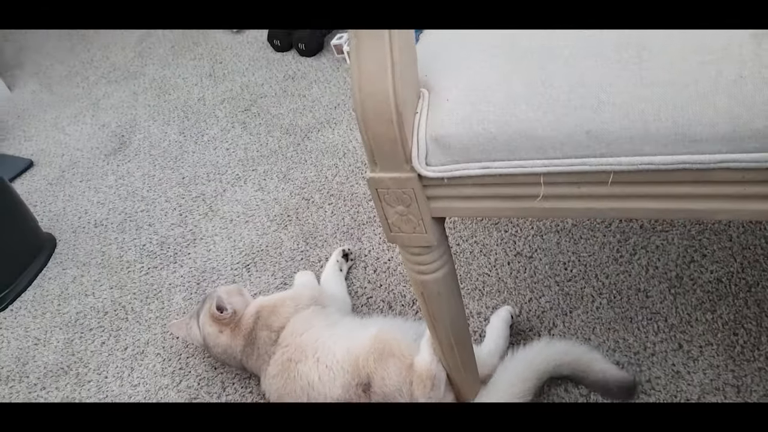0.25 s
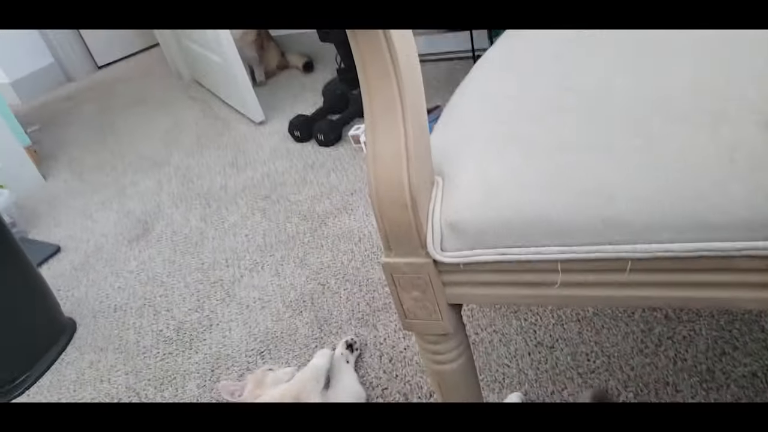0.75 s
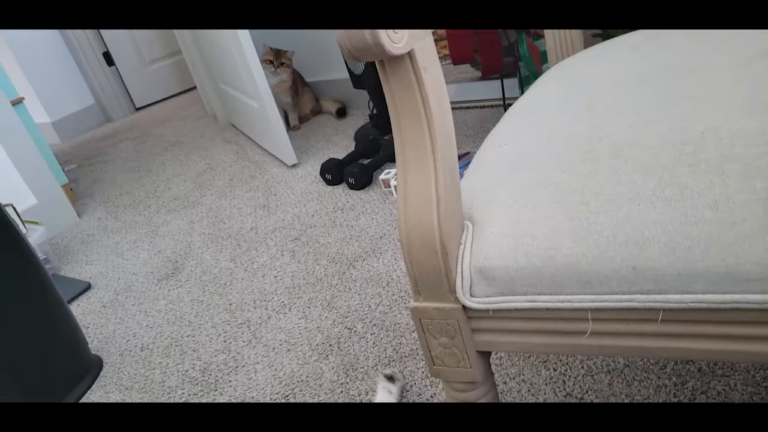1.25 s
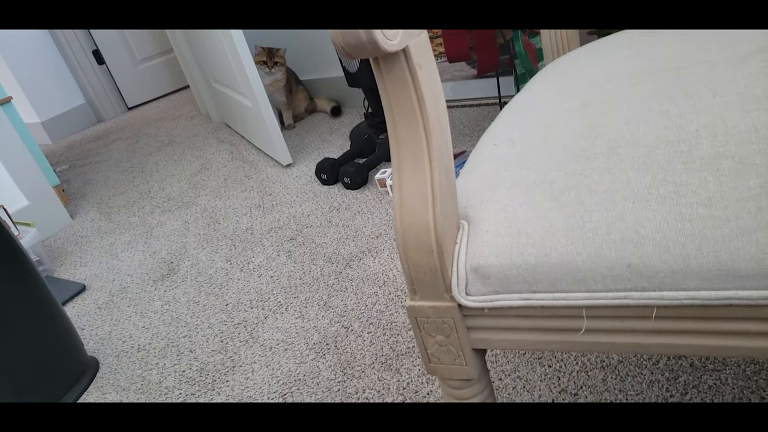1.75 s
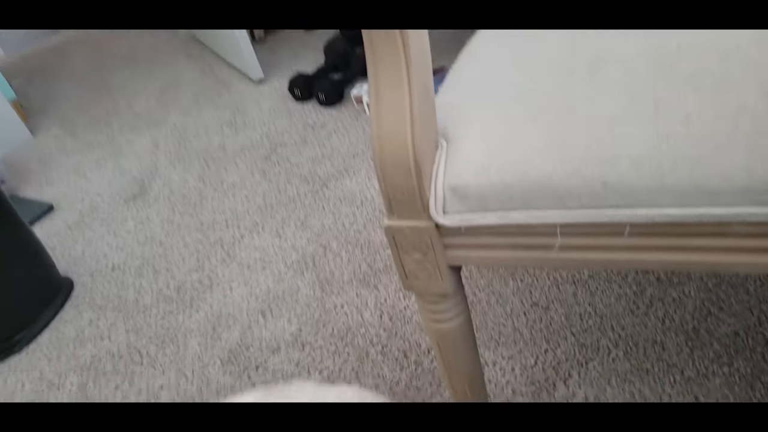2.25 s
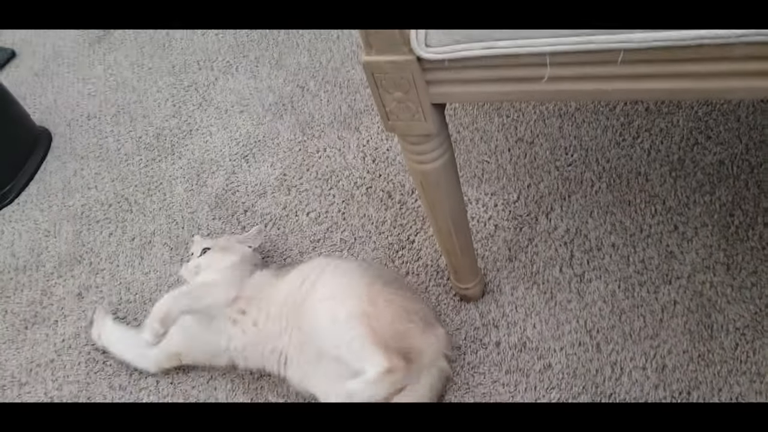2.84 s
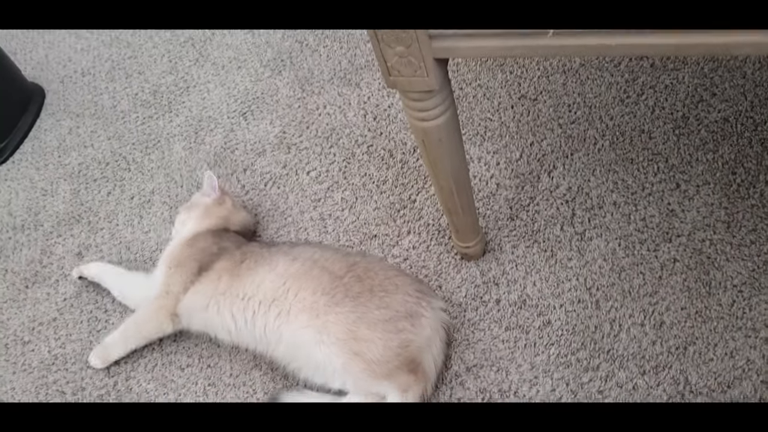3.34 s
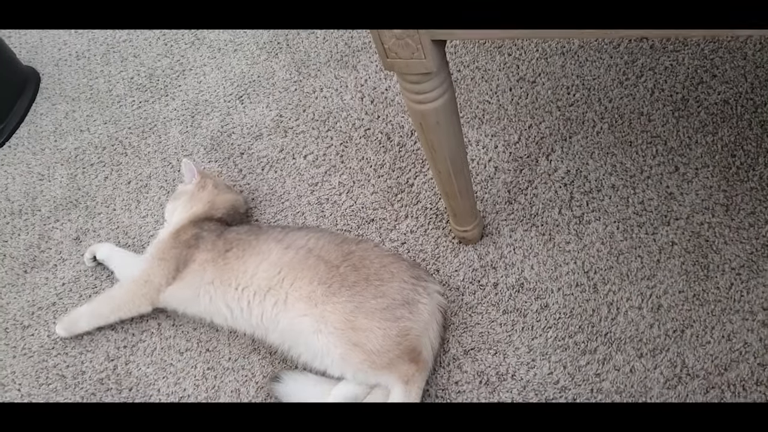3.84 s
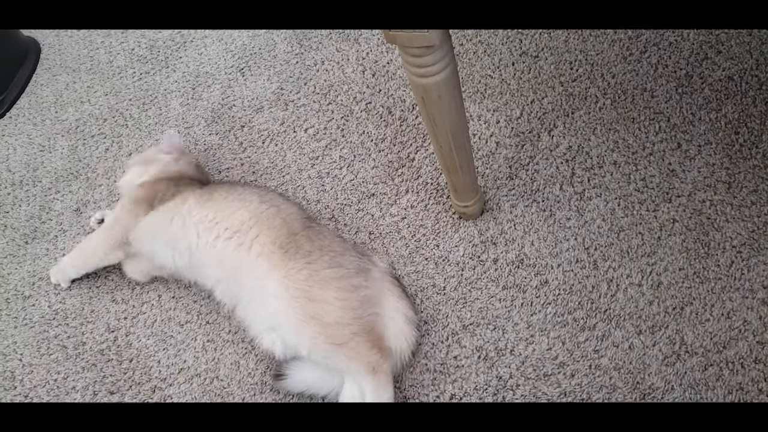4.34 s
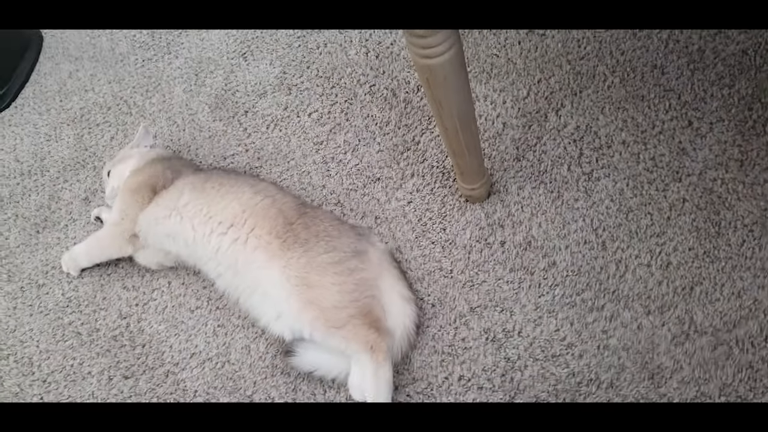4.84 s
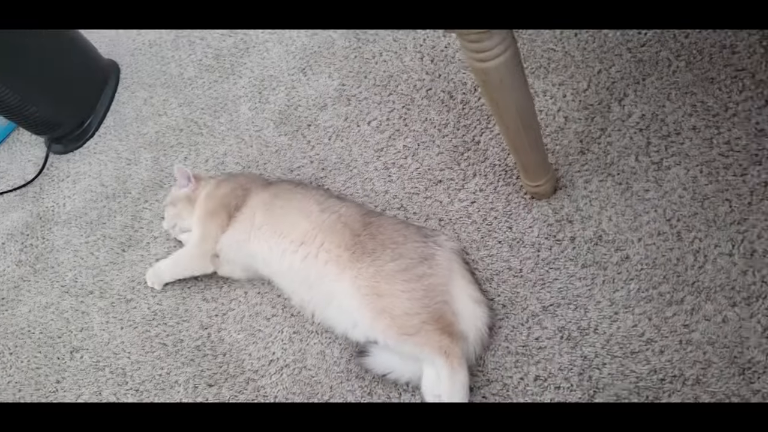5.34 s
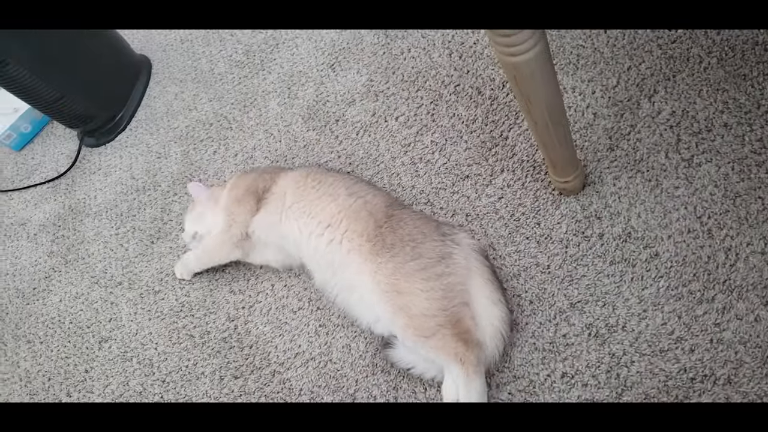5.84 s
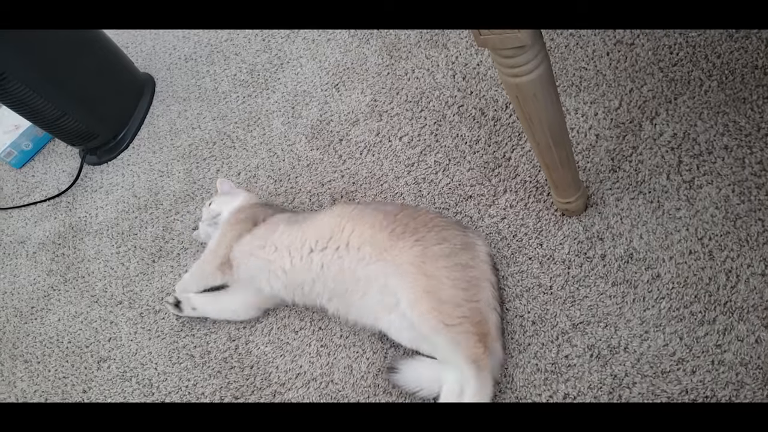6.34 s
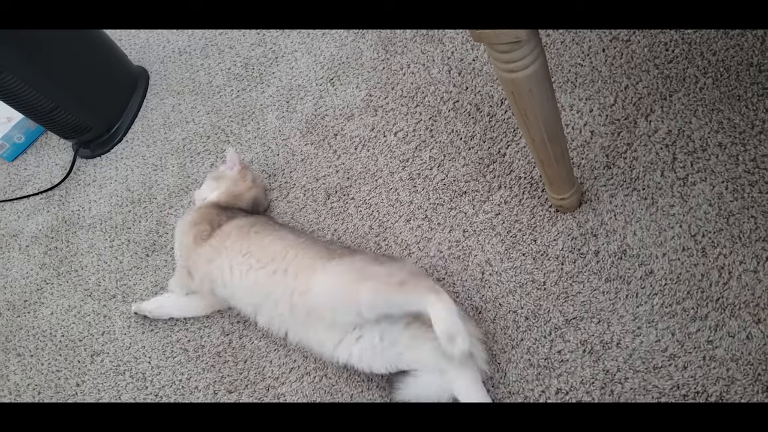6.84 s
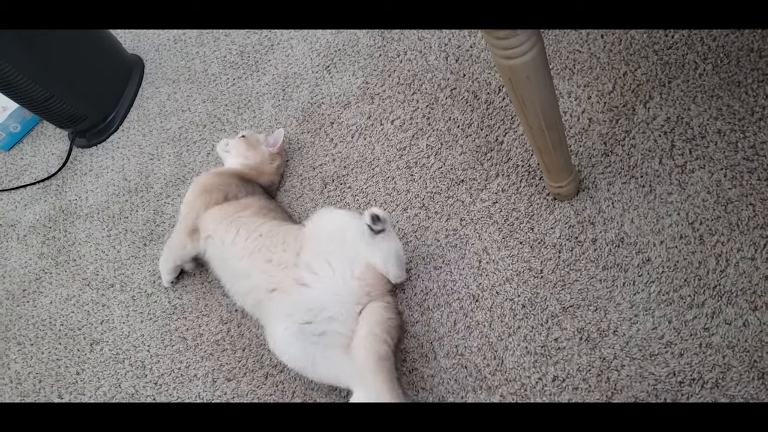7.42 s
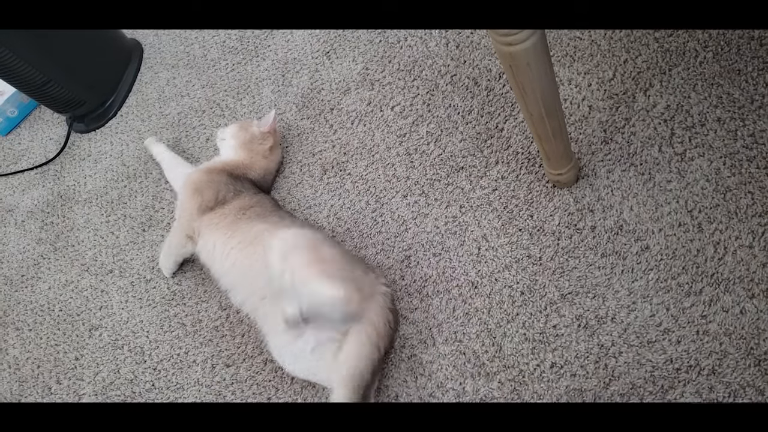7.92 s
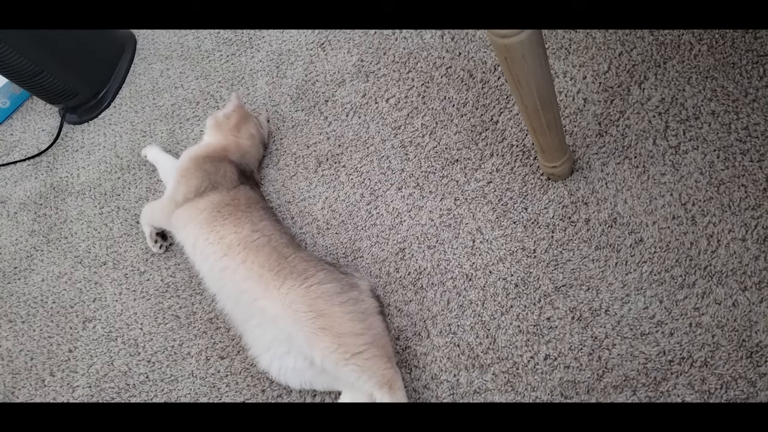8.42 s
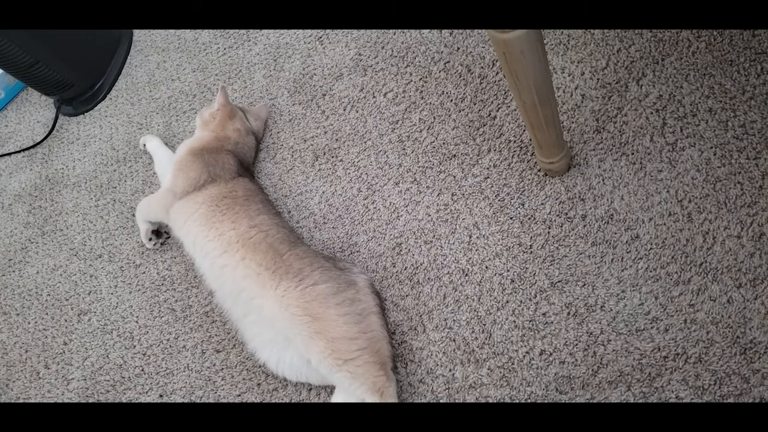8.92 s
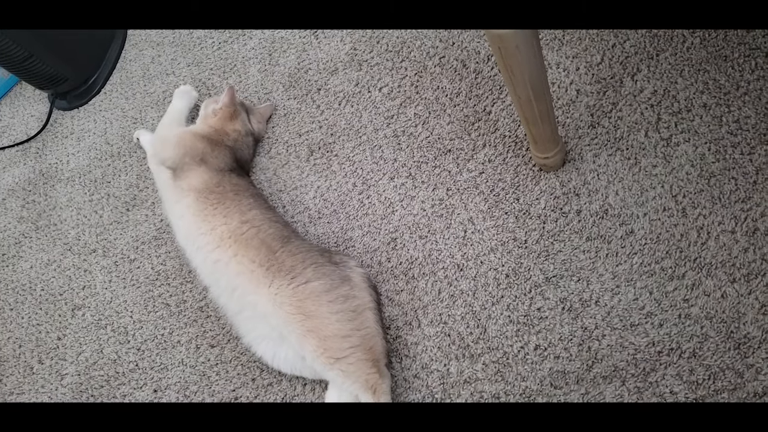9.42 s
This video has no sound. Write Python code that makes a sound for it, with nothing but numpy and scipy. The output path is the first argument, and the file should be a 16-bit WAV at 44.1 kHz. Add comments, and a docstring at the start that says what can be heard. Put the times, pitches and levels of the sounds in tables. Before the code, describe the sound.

Very close stereo handling noise dominates: sharp clacks and thuds on a phone case, little stick-slip creaks and brief skin rubs, busiest at the start and again past two seconds. A cat across the small quiet room murmurs almost pure, wavering low mews, very faint. After five seconds only scattered knocks and light scuffs remain over soft room hiss and hand rumble.

```python
"""Handled phone and a distant cat

Fingers on a hand-held phone knock, creak and rub right at its two microphones, in a quiet carpeted room.
Knocks and creaks are short rings shaped by the case; rubs are crowds of tiny slips over a smooth hiss.
Farther off a cat gives a few soft, low, wavering calls: a few harmonics, hoarser where the pitch sags.
Room reflections, a lumpy rumble from the hand, and the still room's rumble and hiss lie beneath.
"""
import sys
import numpy as np
from scipy import signal
from scipy.fft import rfft, irfft, next_fast_len
from scipy.io import wavfile
from scipy.ndimage import map_coordinates

SR = 44100
rng = np.random.default_rng(int(sys.argv[2]) if len(sys.argv) > 2 else 0)


def file_out(sig):
    """Save sig as 16-bit WAV at sys.argv[1]."""
    # one column per channel
    cols = np.atleast_2d(sig).T
    # limit, then scale
    lim = np.clip(cols, -1, 1)
    pcm = np.round(lim * 32767).astype(np.int16)
    wavfile.write(sys.argv[1], SR, pcm)


N = 426888

# single knocks on the case; top_hz is low for a fingertip, high for a nail:
# start_s, strength_db, thump_db, hardness_db, top_hz
KNOCKS = [(0.0158, 29.5, 6.5, -9.5, 16000), (0.0299, 34.5, 1, -10, 16100), (0.127, 7.5, 20, 1.5, 6070),
          (0.1902, 33, 9, -1, 20000), (0.282, 21.5, 15.5, -12, 12000), (0.2922, 29, 11.5, 8, 20100),
          (0.307, 36.5, 5, -2.5, 16000), (0.3256, 37.5, 3, 0.5, 20000), (0.6074, 28, 8.5, -10.5, 12000),
          (0.6627, 36.5, 2, -7.5, 3070), (0.703, 38, -0.5, -8.5, 3100), (0.7071, 22, 0, -0.5, 9000),
          (0.718, 26.5, 9, -3.5, 9100), (0.7535, 34.5, 7, -2, 3050), (0.7991, 17, -5, -4, 9000),
          (0.9558, 31.5, 4.5, 4, 4100), (1.0731, 34.5, 2.5, -11, 2890), (1.8786, 4, 15, -1.5, 5500),
          (2.1246, 10.5, 14, 3, 4000), (2.1514, 14, 14, 0.5, 9000), (2.1646, 30.5, 11, -27, 1000),
          (2.1855, 18.5, 20.5, -4.5, 4240), (2.2617, 20, 9, -14.5, 2800), (2.3138, 20, 10.5, -4, 2530),
          (2.3471, 19, 8, -12.5, 3460), (2.353, 20, 0, -4.5, 18000), (2.4557, 17.5, 3, -18, 4000),
          (2.5782, 22.5, 6.5, -20, 1800), (2.6285, 26, -1, -3, 16000), (2.6885, 14.5, 9.5, -8, 1300),
          (3.0776, 4, 16, 3, 1600), (3.4071, 13, -1, -2, 4500), (3.6061, 11, 3.5, -16, 3500),
          (3.8507, 1, 16, -13, 5960), (4.7194, 7.5, 4.5, 15.5, 10030), (4.85, 22, -3, -9.5, 4000),
          (4.885, 21, 16, 1.5, 5460), (5.0911, 6, 13, -6.5, 8000), (6.0984, 7, 9.5, -3, 1100),
          (6.1283, 8.5, 4, -5, 11000), (6.6901, 23, 0.5, -6, 2500), (7.456, 32, -3, -4.5, 3430),
          (7.5372, 30, -2.5, -10.5, 2900), (7.7381, 5.5, 10.5, -8, 4500), (7.9229, 8, 1.5, -9, 3003),
          (8.2, -7, 1, -4, 4006)]
# creaks, a finger sticking and slipping at a steady pace; the last four describe the first slip:
# start_s, slip_count, gap_s, swell_db_per_slip, strength_db, thump_db, hardness_db, top_hz
CREAKS = [(0.9712, 3, 0.017, 3.5, 22.5, 7, -14.5, 3500), (1.094, 3, .015, 1, 22, 4.5, -13, 3500),
          (1.484, 3, 0.013, 2.5, 12.5, 5, -14, 4100), (2.6361, 6, .0066, -0.7, 15, 12, 0.5, 1400),
          (2.7885, 4, .0123, 1, 17.5, 3, 0.5, 12900), (4.984, 3, 0.019, 1, 12.5, 14, 1, 5100)]
# corner frequencies of a blow's colour: hz
COLOUR_HZ = [80, 280, 760, 1600, 2900, 5400]
# transfer of a blow through the case to each microphone: hz, left_db, right_db
CASE_TRANSFER = [(25.61, -43, -26), (66.8, -6, 7), (100.7, -4.5, -2), (147, -5.5, -3), (240, -0.5, -8),
                 (550, -4, -14), (1135, -18.5, -24), (1966, -24, -28.5), (3086, -27.5, -30.5),
                 (4850, -29, -33), (5913, -29, -43.5), (7600, -45.5, -44), (11500, -38.5, -35),
                 (16000, -46.5, -51.5)]
# resonances of the held case, peaks or dips, before tuning by the grip: centre_hz, width_hz, left_db, right_db
CASE_MODES = [(135.1, 50, 3, -4.5), (177, 23, -5.5, 3), (252.8, 40, 4.5, -7), (366, 70, -4, 6),
              (446, 60, 3.5, -0.5), (540, 220, -5, 0.5), (820, 110, 2.5, -0.5), (1090, 200, -5.5, -4)]
# the finger's place on the case; tuning scales the resonance centres:
# time_s, right_delay_s, snap_hz, tuning_ratio, hollow_db, left_over_right_db
GRIP = [(.33, -0.00066, 3250, 0.91, 4, 6), (.6, -0.000088, 2420, 0.98, -1.5, -1.5),
        (1.13, 0.0013, 2480, 1.03, -5.5, -3.5), (1.48, -0.0007, 2510, 1, 0, 8),
        (2.2, 0.0008, 2660, 0.8, 3.5, 2), (2.64, .00018, 2800, 1.05, 8, 7),
        (2.799, .00018, 2700, 1.1, 10.5, 0), (3.6, .0001, 1980, 1.05, 16, -7.5),
        (4.72, .00038, 2650, 1.06, -2, 7), (5.1, 0.0017, 2500, 1.02, 6.5, 11.5),
        (6.1, 0.0039, 2000, 1, 4.5, 3), (6.7, 0.0011, 2007, 1.042, 6.5, 4.5)]
# skin sliding on the case: start_s, length_s, level_db, brightness_db_per_octave
RUBS = [(0.951, 0.062, -34.5, 2), (1.096, 0.052, -31, 0.5), (1.506, 0.071, -39, -2), (2.141, 0.058, -47, 4),
        (2.525, 0.025, -34, 1.5), (2.559, 0.16, -37, 0.5), (2.725, 0.044, -33.5, -2.5),
        (2.821, 0.046, -40.5, 1), (3.61, 0.11, -42, .5), (4.845, 0.13, -37.5, 1), (4.982, 0.08, -39, 1),
        (5.83, 0.066, -50, -3.5), (5.988, 0.077, -42, -0.5), (6.101, 0.07, -38.5, -5),
        (7.143, 0.016, -51.5, 3)]
# rub spectrum before brightness: hz, relative_db
RUB_SPECTRUM = [(40, -4.5), (130, 5.5), (260, 7.5), (600, -3.5), (1000, -8.5), (1600, -17.5), (2500, -26.5),
                (5500, -36), (7500, -54), (12000, -37), (16000, -50)]
# cat calls: relative_level_db, second_harmonic_db, hoarseness_0_to_1, pitch curve of (time_s, pitch_hz)
CAT_CALLS = [ (-44, -21.5, .2, [(1.16, 303.3), (1.28, 254.7), (1.34, 245)]),
             (-42, -20, 0.16, [(1.35, 245.4), (1.48, 234.4), (1.54, 299.3), (1.62, 338)]),
             (-48, -23, .2, [(2.06, 372), (2.22, 384)]), (-43, -14, 0.33, [(2.68, 481), (2.87, 489.5),
             (2.97, 515), (3.01, 554), (3.06, 560), (3.09, 464), (3.22, 481.4)]),
             (-52, -25, 0.33, [(4.19, 570), (4.26, 459), (4.35, 464)]), (-40.5, -32, 0.41, [(4.5, 639.4),
             (4.56, 565.6), (4.62, 601.4), (4.76, 521), (4.87, 649), (4.95, 655), (5.01, 686),
             (5.14, 615)])]
# share of a blow or rub sent into the room: hz, gain_db
AIRBORNE = [(60, -21), (250, -19), (700, -17), (1500, -11.5), (5000, -12.5), (12000, -5.5)]
# reverberation: hz, t60_s
ROOM_DECAY = [(100, 0.381), (500, 0.29), (2000, 0.33), (6000, 0.2946), (14000, 0.28)]
# hand rumble over time: time_s, relative_level_db
TREMOR = [(0, -39), (1.08, -43), (1.86, -45.5), (2.53, -35), (3.04, -48.5), (4.5, -52), (4.95, -38),
          (5.299, -52), (6.7, -54.5)]
# hand rumble spectrum: hz, relative_db
TREMOR_SPECTRUM = [(20, -14), (40, -5.5), (60, -1.5), (110, -2.5), (160, -14), (300, -20), (700, -38.5),
                   (3000, -67)]
# still-room spectrum: hz, relative_db_per_hz
FLOOR_SPECTRUM = [(15, -49), (25, -22), (48, -2), (111, -3.5), (150, -14), (400, -25.5), (700, -25),
                  (1400, -26.5), (2100, -26), (7000, -40.5), (10000, -41), (12000, -31), (16000, -34)]
# still-room left-right correlation: hz, correlation
FLOOR_CORRELATION = [(60, 0.65), (180, 0.5), (550, 0.15), (1650, -0.2), (4970, 0.012), (15000, 0.091)]
# still-room balance: hz, left_over_right_db
FLOOR_LEAN = [(60, -1.5), (180, 1), (550, 2), (1650, 6.5), (4970, 3.5), (15000, -1)]

FLOOR_DB, EDGE_HZ = -55, 16000
TICK_DB = -3  # finest part of a blow against its hardness
CALL_RISE_S, CALL_FADE_SHARE = 0.07, 0.2  # the fade is a share of the call's length


def knocks(lag_cycles=0.65, slowest_hz=20, fastest_hz=3000, ripple_db=2.31, scatter_s=0.0009,
           snap_db=6.0, snap_width_hz=1100):
    """Each slip is one blow on the case; low bending waves arrive late, so the ring falls in pitch."""
    size, arrival_s = 4096, 0.0003
    hz, out = np.fft.rfftfreq(size, 1 / SR), np.zeros((2, N))
    bending = 2 * np.pi * lag_cycles * np.log((hz + slowest_hz) / (hz + fastest_hz))
    arrival = 2 * np.pi * hz * arrival_s
    ripple_steps = 6 * np.log2(1 + hz / 500)
    dying = np.clip(np.linspace(3, -1, size), 0, 1)
    for start_s, strength_db, thump_db, hardness_db, top_hz in blows():
        delay_s, snap_hz, tuning, hollow_db, lean_db = grip(start_s)
        # each blow lands on another spot: other resonances, longer treble paths
        knots = rng.standard_normal((4, 35))
        ripple = np.array([map_coordinates(row, [ripple_steps], order=3) for row in knots])
        treble_delay_s = scatter_s * abs(ripple[3]) * hz / (hz + fastest_hz)
        scatter = 2 * np.pi * np.cumsum(treble_delay_s) * hz[1]
        ripples_db = ripple_db * (ripple[:2] / 2 + ripple[2])  # part per microphone, part shared
        colour_db = contact(hz, thump_db, hardness_db, top_hz, hollow_db) + ripples_db
        snap_ring_db = snap_db / (1 + (2 * (hz - snap_hz) / snap_width_hz) ** 2)
        travel = 2 * np.pi * np.outer([0, delay_s], hz)
        ring = causal(strength_db + case(hz, tuning) + colour_db + snap_ring_db)
        spectrum = ring * np.exp(-1j * (bending + scatter + travel + arrival))
        add(out, start_s, -panned(lean_db) * dying * irfft(spectrum))
    return out


def blows():
    """Every blow on the case: the single knocks and each stick-slip of the creaks."""
    slips = []
    for start_s, count, gap_s, swell_db, strength_db, *touch in CREAKS:
        for k in range(round(count)):
            slips.append((start_s + k * gap_s, strength_db + k * swell_db, *touch))
    return KNOCKS + slips


def grip(time_s):
    """The finger's place sets delay, snap pitch, tuning, hollowness and lean."""
    times_s, *columns = np.transpose(GRIP)
    return [np.interp(time_s, times_s, column) for column in columns]


def contact(hz, thump_db, hardness_db, top_hz, hollow_db, steep=8.5, deepest_db=-26):
    """Colour of a blow in dB: weight adds bass, hardness adds treble, contact time cuts the top."""
    corners_db = [thump_db, 0, hardness_db + hollow_db, hardness_db, hardness_db, hardness_db + TICK_DB]
    shelves_db = read(np.c_[COLOUR_HZ, corners_db], hz)
    cut_db = -10 * np.log10(1 + (hz / top_hz) ** steep)
    return shelves_db + np.maximum(cut_db, deepest_db)


def case(hz, tuning):
    """Response of the case at each microphone in dB; the grip shifts its resonances."""
    response_db = np.array([read(CASE_TRANSFER, hz, channels=1), read(CASE_TRANSFER, hz, channels=2)])
    for centre_hz, width_hz, *ports_db in CASE_MODES:
        peak = 1 / (1 + (2 * (hz - tuning * centre_hz) / width_hz) ** 2)
        response_db = response_db + np.outer(ports_db, peak)
    return response_db


def causal(db):
    """Minimum phase: the quickest ring that has this level in each bin."""
    log_gain = np.log(gain_of(db))
    mirrored = np.hstack([log_gain, log_gain[:, -2:0:-1]])
    phase = -signal.hilbert(mirrored).imag[:, :db.shape[1]]
    return np.exp(log_gain + 1j * phase)


def rubs(slips_per_s=320, smooth=0.047, shared=0.43, fade_nepers=1.0, pivot_hz=500, lean_share=0.59):
    """A slide is a crowd of tiny slips over a smooth hiss, easing off as the finger stops."""
    out, shape = np.zeros((2, N)), np.array(RUB_SPECTRUM)
    octaves = np.log2(shape[:, 0] / pivot_hz)
    for start_s, length_s, level_db, bright_db in RUBS:
        count = int(length_s * SR)
        noise = rng.standard_normal((3, count))
        slips = noise * (smooth + (rng.random((3, count)) < slips_per_s / SR))
        tilted = np.c_[shape[:, 0], shape[:, 1] + bright_db * octaves]
        easing = np.exp(-fade_nepers * np.arange(count) / count)
        stroke = signal.windows.tukey(count, 0.25) * easing
        rub = evened(coloured(slips[:2] + shared * slips[2], tilted) * stroke)
        lean_db = lean_share * grip(start_s)[-1]
        add(out, start_s, gain_of(level_db) * panned(lean_db) * rub)
    return out


def cat(jitter=0.0186, jitter_hz=91.7, flutter_hz=250, overtone_fall_db=9, least_rough=0.17):
    """A nearly closed mouth gives an almost pure tone; where pitch sags the folds flutter, turning hoarse."""
    out = np.zeros((2, N))
    for level_db, second_db, hoarse, pitch in CAT_CALLS:
        times_s, pitch_hz = np.transpose(pitch)
        t = np.arange(times_s[0], times_s[-1], 1 / SR)
        hz = np.interp(t, times_s, pitch_hz)
        sag = (hz.max() - hz) / (np.ptp(hz) + 1)
        rough = np.clip(least_rough + hoarse * sag, 0, 1)
        rise = np.minimum((t - times_s[0]) / CALL_RISE_S, 1)
        fade = np.minimum((times_s[-1] - t) / (CALL_FADE_SHARE * np.ptp(times_s)), 1)
        phase = 2 * np.pi * np.cumsum(hz * (1 + jitter * wander(len(t), jitter_hz))) / SR
        tone = np.exp(1j * phase)
        for k in range(2, 5):
            tone = tone + gain_of(second_db - overtone_fall_db * (k - 2)) * np.exp(1j * k * phase)
        unsteady = wander(len(t), flutter_hz) + 1j * wander(len(t), flutter_hz)
        flutter = np.sqrt(2 * (1 - rough ** 2)) + rough * unsteady
        call = (tone * flutter).real * gain_of(level_db) * rise * fade
        add(out, times_s[0], panned(0) * call)
    return out


def room(x, first_s=0.0083):
    """Dense reflections after a short gap, each band dying at its own speed."""
    taps = rng.standard_normal((2, SR // 2))
    taps[:, :int(first_s * SR)] = 0
    hz, t, bands = signal.stft(taps, SR, nperseg=256)
    decay = gain_of(-60 * t / read(ROOM_DECAY, hz)[:, None])
    tail = signal.istft(bands * decay, SR, nperseg=256)[1]
    return signal.fftconvolve(x, tail / np.linalg.norm(tail[0]), axes=1)[:, :N]


def tremor(level_db=-3, lumpy_db=2, lumps_hz=15, shared=2.6):
    """The holding hand makes a soft, lumpy low rumble, mostly shared by both microphones."""
    noise = rng.standard_normal((3, N))
    curve_db = np.interp(np.arange(N) / SR, *np.transpose(TREMOR)) + lumpy_db * wander(N, lumps_hz)
    rumble = evened(coloured(noise[:2] + shared * noise[2], TREMOR_SPECTRUM))
    return gain_of(level_db + curve_db) * rumble


def still_room():
    """Low rumble of the house and the microphones' hiss: noise with a set correlation in each band."""
    hz = np.fft.rfftfreq(N, 1 / SR)
    left, other = rfft(rng.standard_normal((2, N)))
    same = np.clip(read(FLOOR_CORRELATION, hz), -1, 1)
    right = same * left + np.sqrt(1 - same ** 2) * other
    spectrum_db = read(FLOOR_SPECTRUM, hz) + np.outer([0.5, -0.5], read(FLOOR_LEAN, hz))
    pair = np.array([left, right]) * gain_of(spectrum_db)
    return gain_of(FLOOR_DB) * evened(irfft(pair, N))


def gain_of(db):
    """Decibels to amplitude."""
    return 10 ** (np.asarray(db) / 20)


def evened(x):
    """Scales to rms 1 over all channels."""
    return x / np.sqrt(np.mean(x ** 2) + 1e-20)


def read(points, hz, channels=1):
    """Interpolates one column of a table over log frequency."""
    table = np.array(points)
    return np.interp(np.log(hz + 1), np.log(table[:, 0] + 1), table[:, channels])


def add(mix, start_s, sound):
    """Lays a stereo sound into the mix."""
    part = mix[:, max(round(start_s * SR), 0):][:, :sound.shape[1]]
    part += sound[:, :part.shape[1]]


def panned(lean_db):
    """Left and right gains, left over right in dB."""
    return gain_of([[lean_db / 2], [-lean_db / 2]])


def coloured(x, points):
    """Filters by a spectrum in dB, zero phase."""
    size = x.shape[-1]
    fast = next_fast_len(size)
    gain = gain_of(read(points, np.fft.rfftfreq(fast, 1 / SR)))
    return irfft(rfft(x, fast) * gain, fast)[..., :size]


def wander(count, rate_hz):
    """Smooth random motion through unit-variance knots at rate_hz."""
    knots = np.arange(count) * rate_hz / SR
    values = rng.standard_normal(int(knots[-1]) + 2)
    return map_coordinates(values, [knots], order=3, mode="nearest")


def scene(cat_direct_db=-2, cat_room_db=-6, radiated_limit=0.035):
    """The case is at the microphones and nearly dry; the cat is out in the room."""
    handling, calls = knocks() + rubs(), cat()
    # the hardest blows go mostly through the case; little more of them reaches the air
    radiated = radiated_limit * np.tanh(coloured(handling, AIRBORNE) / radiated_limit)
    echo = room(radiated + gain_of(cat_room_db) * calls)
    return handling + gain_of(cat_direct_db) * calls + echo + still_room() + tremor()


def record(dry):
    """Peaks beyond full scale clip; then a low-pass at the band edge."""
    clipped = np.clip(dry, -1, 1)
    lowpass = signal.firwin(255, EDGE_HZ, window=("kaiser", 9), fs=SR)
    return signal.oaconvolve(clipped, lowpass[None], "same")


dry = scene()
out = record(dry)
file_out(out)
```